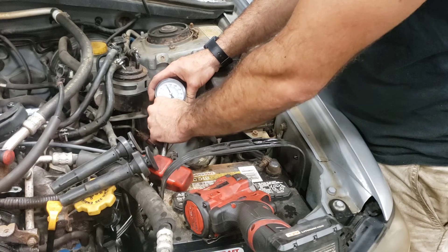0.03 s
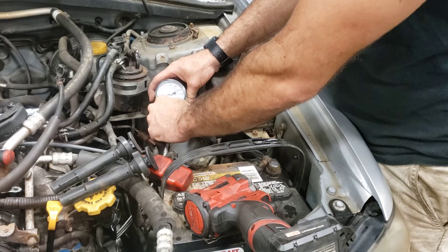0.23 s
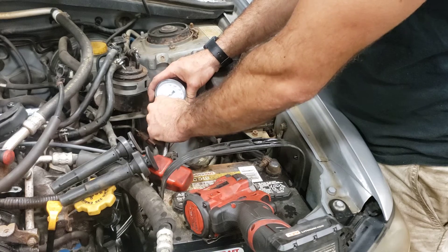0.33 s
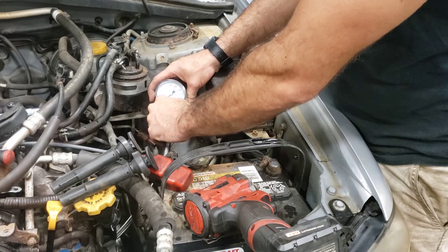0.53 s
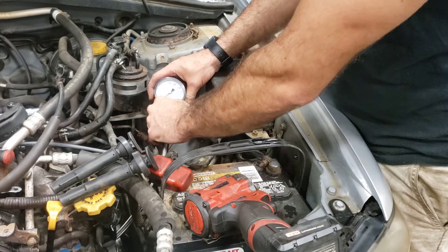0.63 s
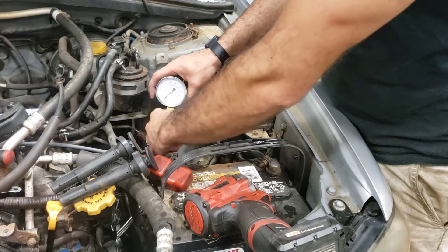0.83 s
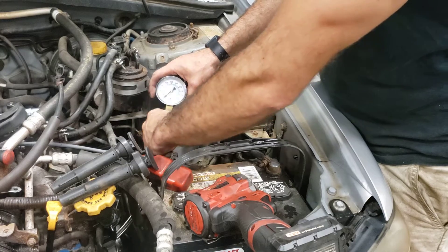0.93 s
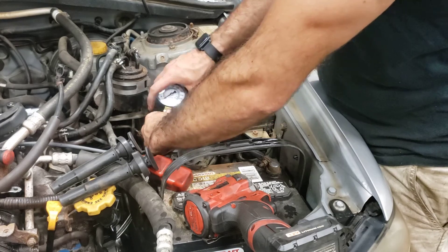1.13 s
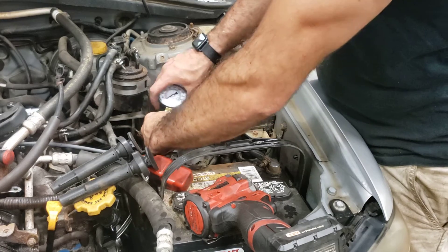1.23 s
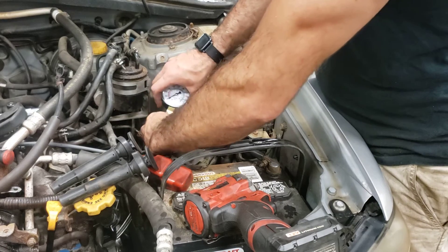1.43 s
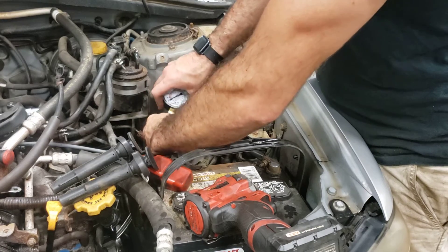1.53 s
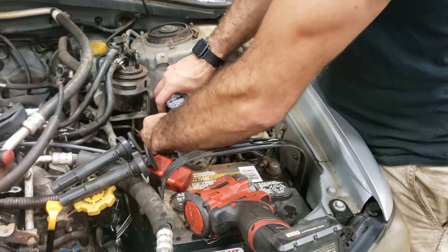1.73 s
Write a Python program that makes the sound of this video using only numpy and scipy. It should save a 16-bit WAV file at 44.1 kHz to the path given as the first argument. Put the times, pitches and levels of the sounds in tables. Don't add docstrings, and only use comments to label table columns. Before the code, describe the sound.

A short sharp hiss of air bursts from a gauge's bleed valve beside a car engine

```python
import sys
import numpy as np
from scipy import signal
from scipy.fft import rfft, irfft, next_fast_len
from scipy.io import wavfile
from scipy.ndimage import uniform_filter1d, map_coordinates

SR = 44100
rng = np.random.default_rng(int(sys.argv[2]) if len(sys.argv) > 2 else 0)


def level_to_linear(level):
    exponent = np.asarray(level, float) / 20
    return 10 ** exponent


def wrap_up_sound(samples):
    columns = np.atleast_2d(samples).T
    tamed = np.clip(columns, -1, 1)
    steps = np.round(tamed * 32767).astype(np.int16)
    wavfile.write(sys.argv[1], SR, steps)


N = 79380


def unit(x):
    return x / np.sqrt(np.mean(x ** 2) + 1e-20)


def along(points, hz):
    f, v = np.transpose(points)
    return np.interp(np.log(hz + 1), np.log(f + 1), v)


def wobble(rate):
    return map_coordinates(rng.standard_normal(N // 20), [np.arange(N) * rate / SR])


def filtered(x, response):
    m = next_fast_len(N + SR // 2)
    return irfft(rfft(x, m) * response(np.fft.rfftfreq(m, 1 / SR)), m)[..., :N]


def peak(f, hz, width):
    return 1j * f * width / (hz * hz - f * f + 1j * f * width)


def pair(gain):
    # f/Hz, correlation
    likeness = [(60, 0.87), (180, 0.91), (550, 0.63), (1650, 0.01), (4970, -0.04), (15000, -0.23)]

    def mid_side(hz):
        turn = np.arccos(np.clip(along(likeness, hz), -1, 1)) / 2
        return gain(hz) * np.array([np.cos(turn), np.sin(turn)])

    mid, side = filtered(rng.standard_normal((2, N)), mid_side)
    return unit(np.array([mid + side, mid - side]))


def rumble():
    # t/s, level/dB
    rumble_course = [(0.0, -50), (0.04, -51), (0.19, -54.5), (0.214, -50.5), (0.28, -58), (0.536, -57),
                     (0.732, -61), (0.786, -57), (0.812, -62.5), (1.006, -55.5), (1.082, -59), (1.392, -59),
                     (1.484, -57), (1.8, -58)]
    # f/Hz, level per Hz/dB
    drone_tone = [(30, -37.5), (44, -21), (70, -11), (110, -7), (290, -12.5), (430, -19), (600, -34),
                  (1200, -46.5)]
    # f/Hz, width/Hz, level/dB
    hum_bands = [(113.36, 10, -6), (165, 10, -13.5), (270.5, 12, -11.5)]
    # f/Hz, level per Hz/dB
    hiss_tone = [(800, -8.5), (1400, -17), (2200, -20.5), (4400, -27), (6000, -29.5), (9000, -31.5),
                 (11500, -20.5), (15800, -21)]
    s, db = np.transpose(rumble_course)
    t = np.arange(N) / SR
    drone = pair(lambda f: level_to_linear(along(drone_tone, f)) * (f < 1200) * (f > 22))
    hums = sum(level_to_linear(g) * pair(lambda f: np.abs(peak(f, c, w)) ** 2) for c, w, g in hum_bands)
    low = np.array([unit(port) for port in drone + hums])
    even = np.sqrt(np.abs(uniform_filter1d(np.mean(low ** 2, axis=0), size=3000))) + 0.26
    level = level_to_linear(np.interp(t, s, db) + 2.0) / even
    hiss_level = level_to_linear(-80.5 + 5 * (t < 0.16))
    hiss = pair(lambda f: level_to_linear(along(hiss_tone, f)) * (f > 800))
    return level * low + hiss_level * hiss


def throb():
    # t/s, f/Hz, level/dB
    motor_course = [(0.0, 51, -49.5), (0.07, 51.5, -65.5), (0.154, 52.9, -50.5), (0.32, 52.9, -60),
                    (0.416, 60.5, -60), (0.536, 53.2, -60.5), (0.752, 52.3, -66.5), (0.846, 57.46, -58.5),
                    (0.906, 57.6, -60.5), (1.066, 53.94, -58.5), (1.258, 53.5, -62), (1.322, 58, -75.5),
                    (1.398, 57.7, -57.5), (1.464, 59.2, -75.5), (1.554, 57.9, -52), (1.708, 60.1, -75.5),
                    (1.774, 61, -53.5), (1.8, 58.7, -62)]
    level_db, pitch_wander = 1.12, .08
    s, hz, db = np.transpose(motor_course)
    t = np.arange(N) / SR
    pitch = np.interp(t, s, hz) * (1 + pitch_wander * wobble(18))
    phase = 2 * np.pi * np.cumsum(pitch) / SR
    return np.sqrt(2) * level_to_linear(np.interp(t, s, db) + level_db) * np.sin(phase)


def hands():
    # t/s, level/dB, centre f/Hz, width/Hz, t60/s
    tick_list = [
        (0.002, -74, 3000, 3000, 0.036),
        (0.771, -68, 1157, 500, 0.12),
        (0.772, -74.5, 2000, 1174, .03),
        (1.115, -70.5, 1490, 1790, 0.026),
        (1.246, -75, 6300, 1300, 0.0438),
        (1.647, -76, 6500, 1800, 0.026),
        (1.698, -75.5, 6330, 500, 0.089),
        (1.793, -75.5, 2500, 3000, 0.018),
    ]
    # t/s, length/s, level/dB
    rub_list = [
        (1.092, .045, -79.5),
        (1.145, .045, -81),
        (1.262, .04, -87),
    ]
    # f/Hz, level per Hz/dB
    skin_tone = [(1000, -7), (2500, -10), (5000, -14), (5800, -1), (7200, 0), (8300, -13), (12000, -6),
                 (15800, 0)]
    t, ticks = np.arange(N) / SR, np.zeros((2, N))
    for s, db, hz, width, t60 in tick_list:
        decay = (t >= s) * level_to_linear(db - 60 * np.maximum(t - s, 0) / t60)
        puff = decay * rng.standard_normal((2, N))
        ticks += filtered(puff, lambda f: 4 * peak(f, hz, width) ** 2 + level_to_linear(-18))
    stroke = sum(level_to_linear(db) * np.exp(-((t - s - d / 2) / (d / 2)) ** 4) for s, d, db in rub_list)
    rough = rng.standard_normal((2, N)) * level_to_linear(1.7 * wobble(200))
    skin = filtered(rough, lambda f: level_to_linear(along(skin_tone, f)) * (f > 900))
    return ticks + stroke * unit(skin)


def garage(x):
    # f/Hz, t60/s
    room_decay = [(600, 0.88), (1700, 0.35), (3500, 0.87), (5000, 0.75), (5800, 1), (7100, 1), (8300, 1),
                  (15000, 0.33)]
    # f/Hz, level/dB
    room_tone = [(700, -5.5), (1700, -12), (3500, -11), (5300, -9.5), (6800, -2.5), (7800, -15.5),
                 (9000, -8), (15000, -16)]
    drain_db = 33
    hz, t, z = signal.stft(rng.standard_normal((2, SR)), SR, nperseg=256)
    t60 = along(room_decay, hz)[:, None]
    fall_db = along(room_tone, hz)[:, None] - 60 * t / t60 - drain_db * t * t
    even_energy = np.sqrt(6 * np.log(10) / t60 / SR)
    tail = signal.istft(z * level_to_linear(fall_db) * even_energy, SR, nperseg=256)[1]
    late = np.pad(x, ((0, 0), (400, 0)))
    return signal.fftconvolve(late, tail, axes=1)[:, :N]


def engine_bay(x):
    spread_s, level_db = .012, -13
    delay = spread_s * rng.random((2, 9, 1))
    sign = rng.standard_normal((2, 9, 1)) / 3

    def mirrors(f):
        echoes = (sign * np.exp(-2j * np.pi * f * delay)).sum(axis=1)
        return 1 + level_to_linear(level_db) * f / (f + 900) * 2 * echoes

    return filtered(x, mirrors)


def opposed(x):
    # from t/s, to t/s, f/Hz, width/Hz
    opposed_bands = [
        (.247, .278, 4080, 420),
        (.278, .306, 4250, 520),
        (.306, .40, 4200, 300),
    ]
    t, mid = np.arange(N) / SR, x.mean(axis=0)
    shared = 0
    for a, b, hz, width in opposed_bands:
        hold = np.exp(-((2 * t - a - b) / (b - a)) ** 12)
        shared = shared + hold * filtered(mid, lambda f: np.exp(-((f - hz) / width * 2) ** 6))
    return x - shared


def jet():
    # t/s, level/dB
    jet_course = [
        (.197, -81.5),
        (.201, -50.5),
        (.224, -31),
        (.240, -28),
        (.258, -23.5),
        (.295, -32),
        (.47, -48),
        (.6, -66),
        (.8, -92),
    ]
    # f/Hz, level per Hz/dB
    nozzle_tone = [(400, -26.5), (700, -25), (1100, -23.5), (2800, -13.5), (5000, -7.5), (9000, -11),
                   (12500, 1), (15800, 1.5)]
    # f/Hz, gain per dB of jet strength/dB
    growth = [(600, 1.33), (1500, 1.08), (3500, 1.08), (6500, 1.52), (9000, 1.36), (12000, 0.94),
              (15500, 1.12)]
    # f/Hz, width/Hz, over the jet at the left port/dB, at the right port/dB
    cavity_list = [(600, 120, 4, 5), (820, 150, 4, 3), (1060, 200, 8, 5), (2100, 300, 3, -9),
                   (3680, 300, 4, 0), (7800, 350, 11, 1), (10000, 400, -2, -12), (11900, 500, -12, -3)]
    # f/Hz, share of power
    common_share = [(600, .9), (1500, .6), (2400, .15), (3500, .15), (4100, .8), (4800, .4), (8000, .5),
                    (15000, .4)]
    # f/Hz, delay after opening/s
    eddy_delay = [(500, .012), (2000, .010), (5000, 0.0039), (8000, .005), (9500, .0001)]
    # f/Hz, level/dB
    right_shade = [(600, 3), (1900, 1.5), (2500, -2.5), (3200, 3.5), (9000, 1), (10000, -1.5), (12000, 2.5),
                   (15800, -3)]
    level_db, patchy_db = 1, 1.2
    flutter_db, flutter_rate = 0.04, 270
    right_lag_s = .00012
    s, db = np.transpose(jet_course)
    hz, t, z = signal.stft(rng.standard_normal((3, N)), SR, nperseg=128, noverlap=96)
    patches = uniform_filter1d(rng.standard_normal(z.shape[1:]), size=2, axis=0)
    patches = uniform_filter1d(patches, size=24, axis=1)
    share = np.clip(along(common_share, hz), 0, 1)[:, None]
    z = np.sqrt(share) * z[0] + np.sqrt(1 - share) * z[1:]

    below_db = np.interp(t, s, db - db.max(), left=-120, right=-120)
    started = t > s[1] + along(eddy_delay, hz)[:, None] - .002
    flow_db = along(growth, hz)[:, None] * below_db
    z = z * started * level_to_linear(flow_db + patchy_db * unit(patches))
    air = signal.istft(z, SR, nperseg=128, noverlap=96)[1][:, :N]
    air = air * level_to_linear(flutter_db * wobble(flutter_rate))

    def nozzle_to_ports(f):
        nozzle = level_to_linear(along(nozzle_tone, f)) * f ** 4 / (f ** 4 + 400. ** 4)
        cavities = 1 + sum(level_to_linear([[left], [right]]) * peak(f, c, w) for c, w, left, right in cavity_list)
        right_only = np.array([[0], [1]])
        shade = level_to_linear(along(right_shade, f) * right_only)
        lag = np.exp(-2j * np.pi * f * right_lag_s * right_only)
        return nozzle * cavities * shade * lag

    return level_to_linear(db.max() + level_db + 6) * filtered(air, nozzle_to_ports)


def scene():
    air, side = jet(), np.array([[.5], [-.5]])
    vent = opposed(level_to_linear(3.6 * side) * (engine_bay(air) + garage(air)))
    return vent + level_to_linear(2.5 * side) * (rumble() + throb() + hands())


def top_cut(x):
    return signal.sosfilt(signal.butter(12, 16990, fs=SR, output="sos"), x)


def record(dry):
    limited = filtered(dry, lambda hz: .5 - .5 * np.tanh((hz - 15745) / 14))
    return top_cut(limited)


dry = scene()
out = record(dry)
wrap_up_sound(out)
```